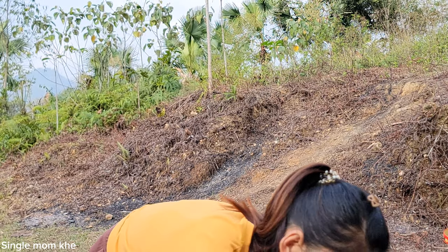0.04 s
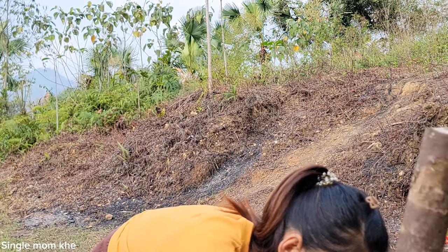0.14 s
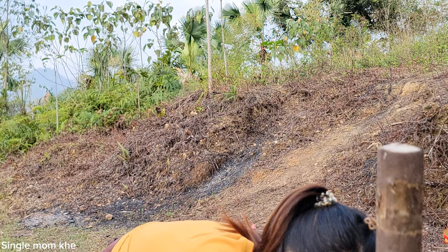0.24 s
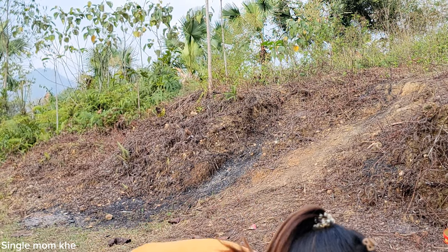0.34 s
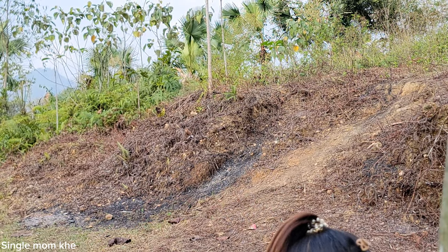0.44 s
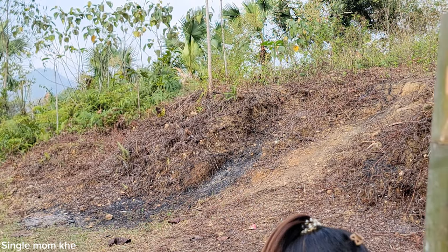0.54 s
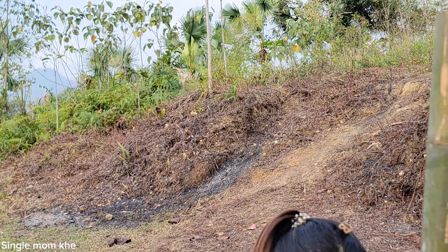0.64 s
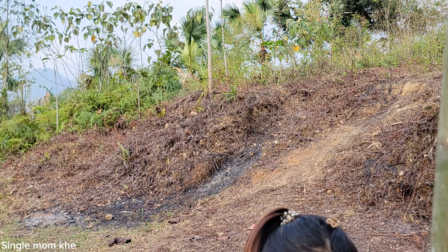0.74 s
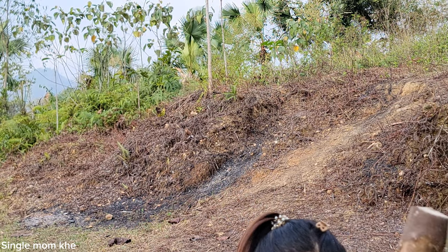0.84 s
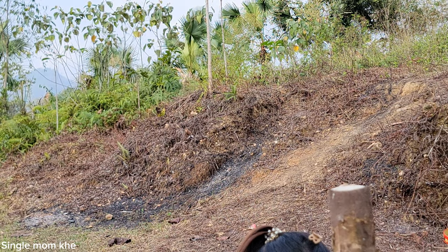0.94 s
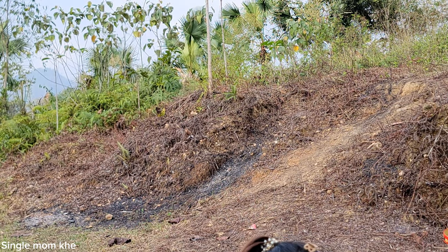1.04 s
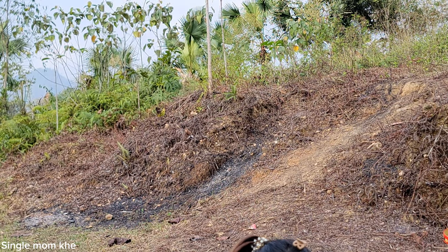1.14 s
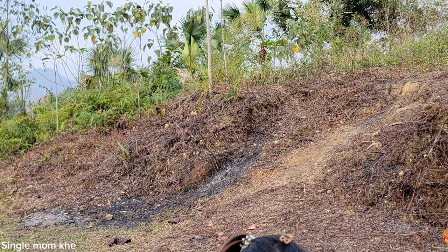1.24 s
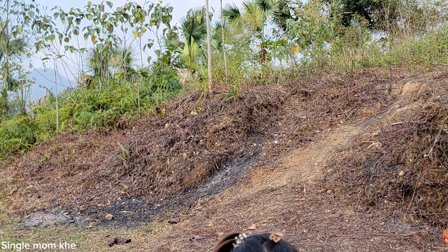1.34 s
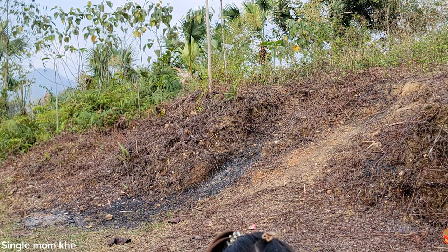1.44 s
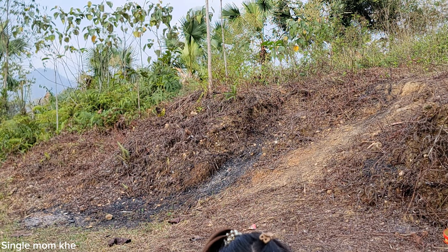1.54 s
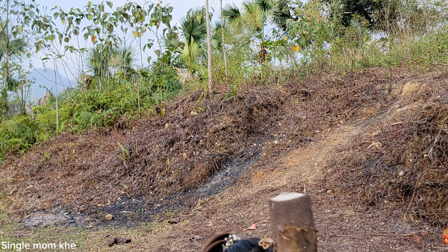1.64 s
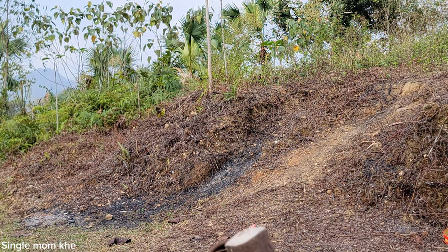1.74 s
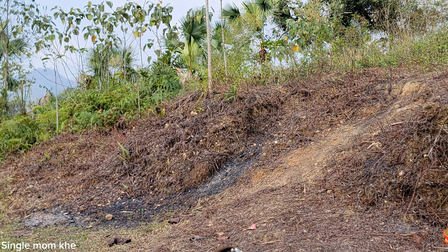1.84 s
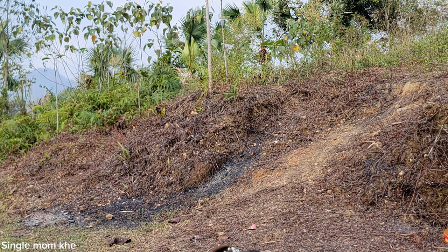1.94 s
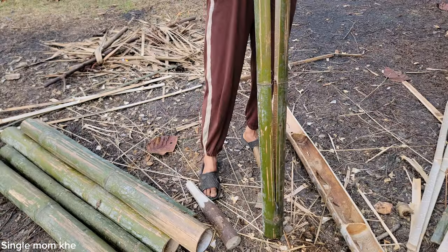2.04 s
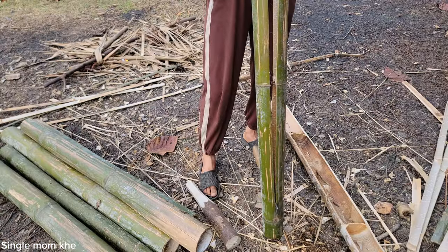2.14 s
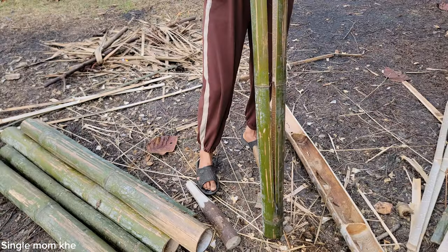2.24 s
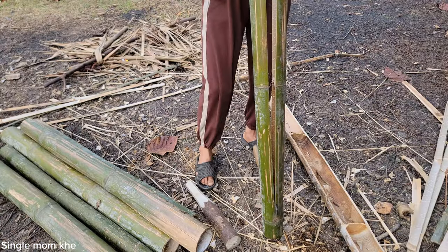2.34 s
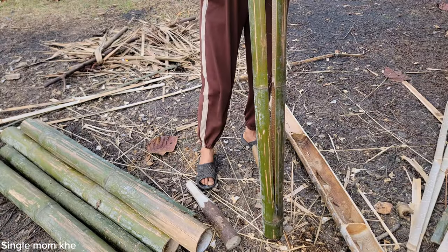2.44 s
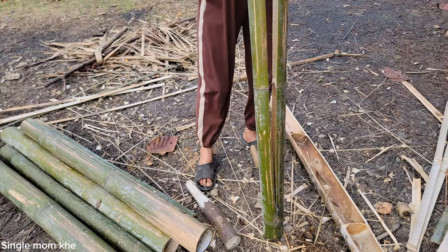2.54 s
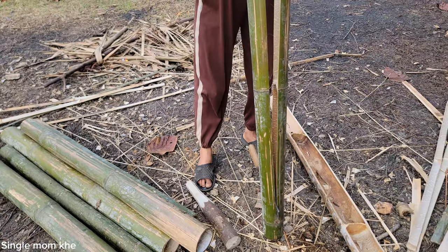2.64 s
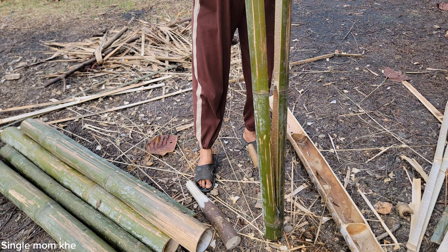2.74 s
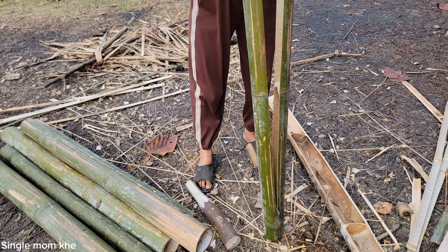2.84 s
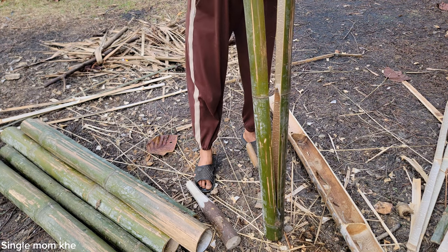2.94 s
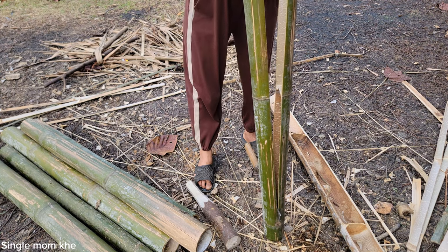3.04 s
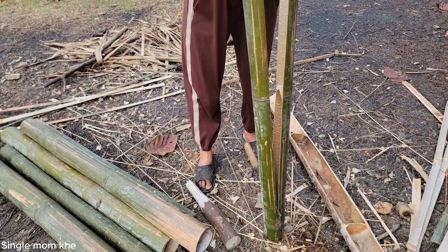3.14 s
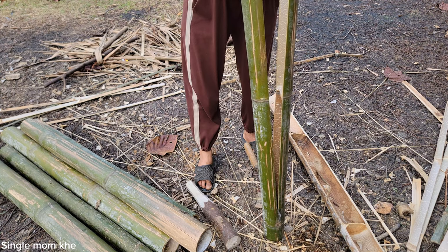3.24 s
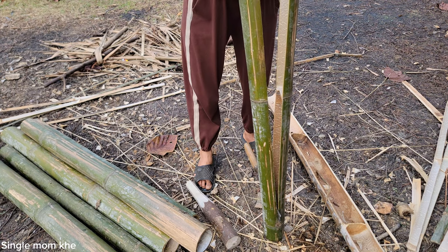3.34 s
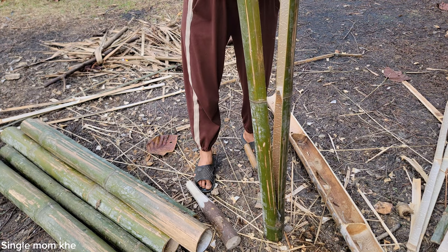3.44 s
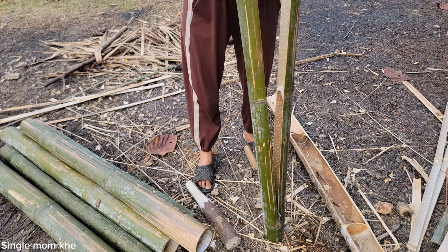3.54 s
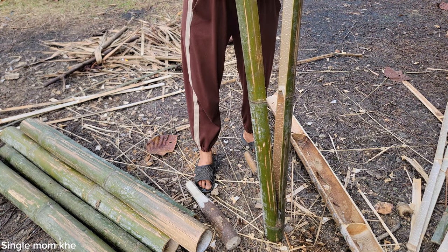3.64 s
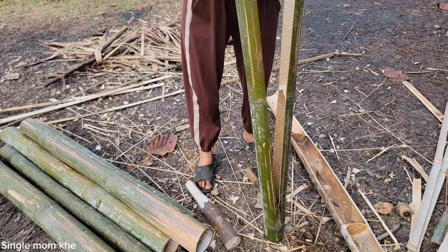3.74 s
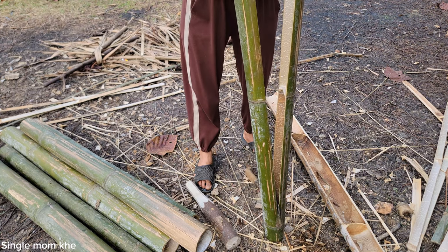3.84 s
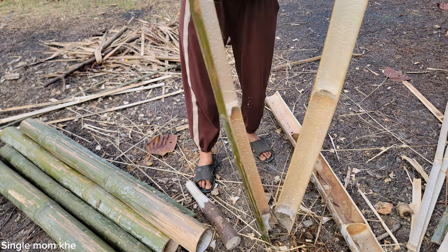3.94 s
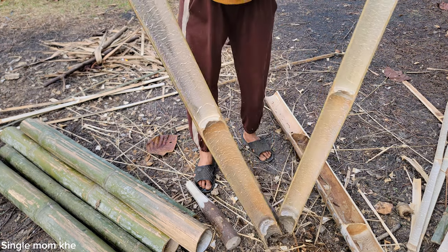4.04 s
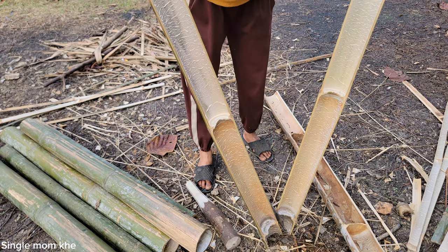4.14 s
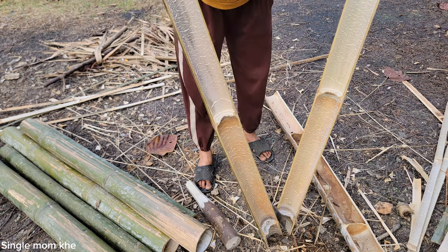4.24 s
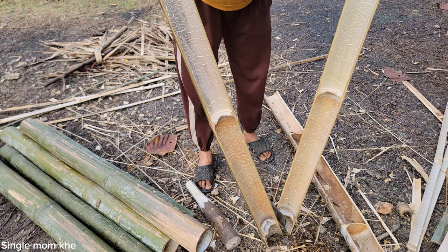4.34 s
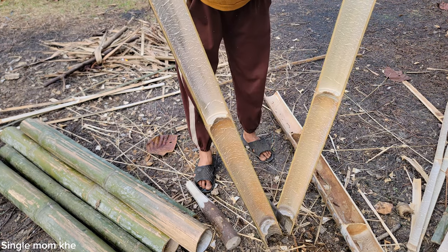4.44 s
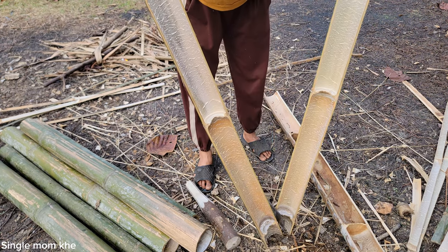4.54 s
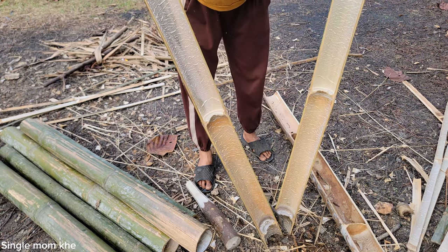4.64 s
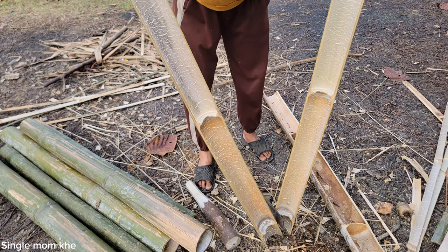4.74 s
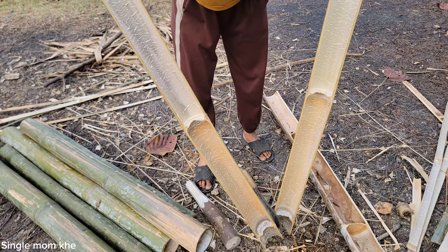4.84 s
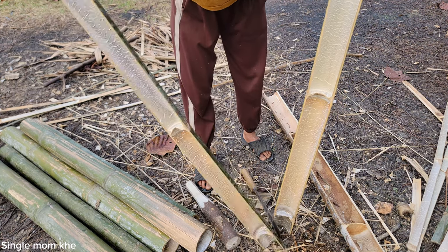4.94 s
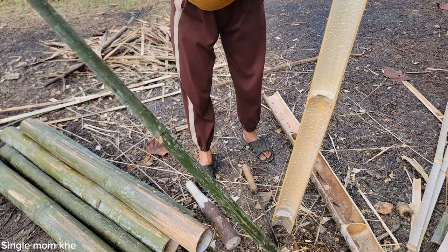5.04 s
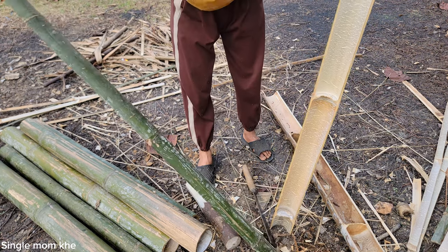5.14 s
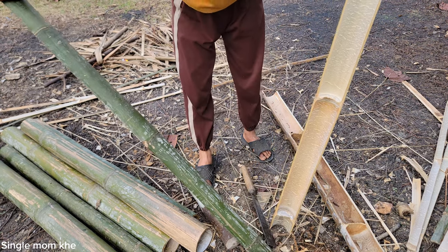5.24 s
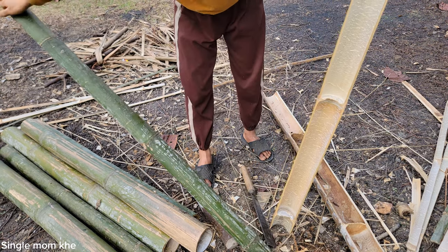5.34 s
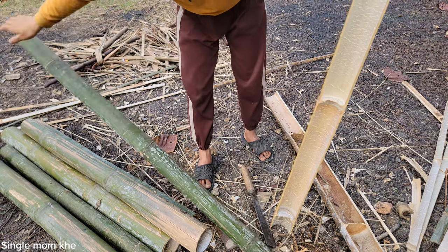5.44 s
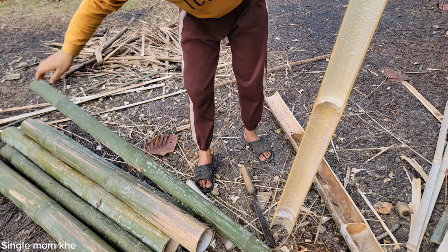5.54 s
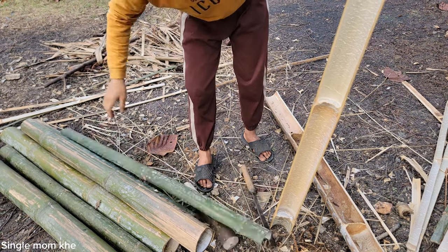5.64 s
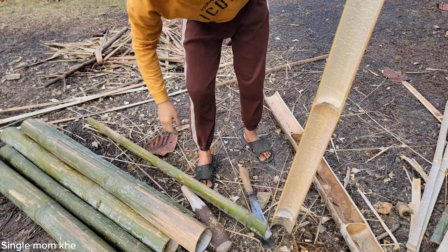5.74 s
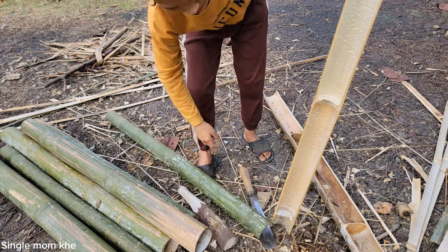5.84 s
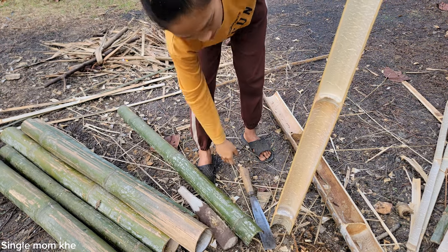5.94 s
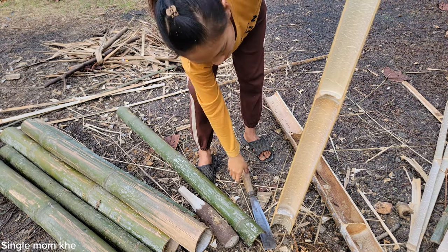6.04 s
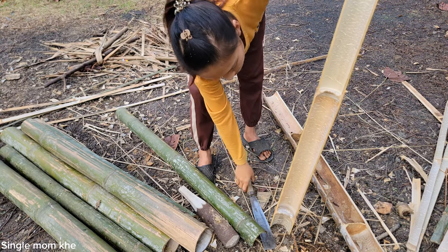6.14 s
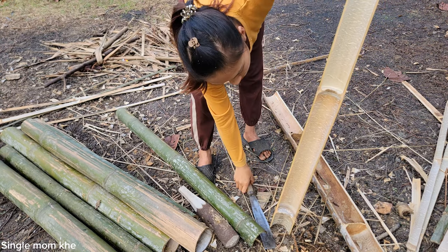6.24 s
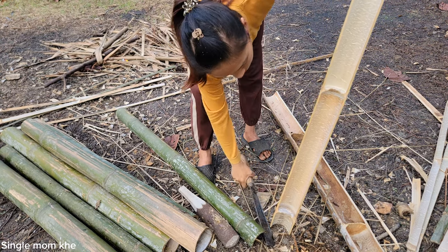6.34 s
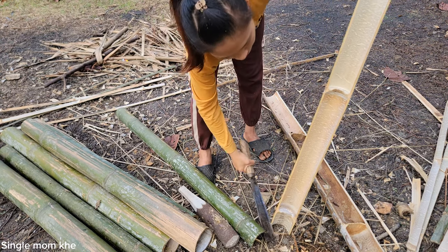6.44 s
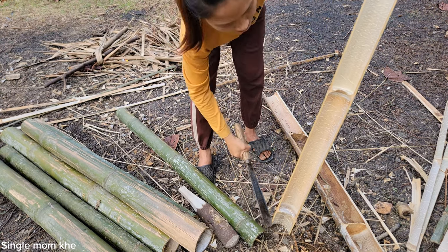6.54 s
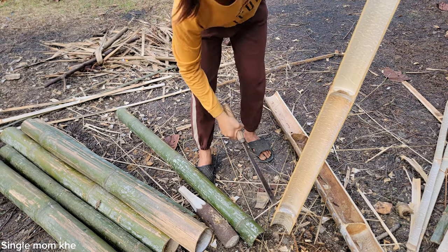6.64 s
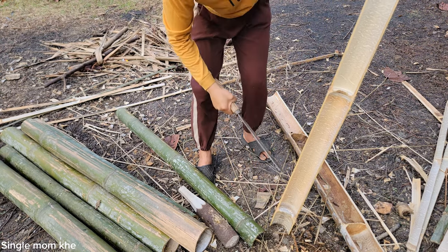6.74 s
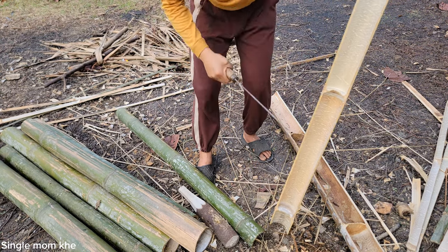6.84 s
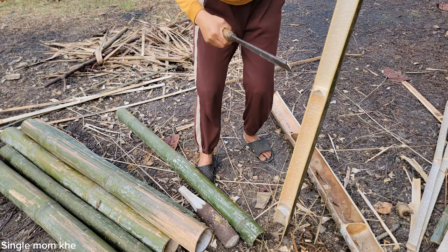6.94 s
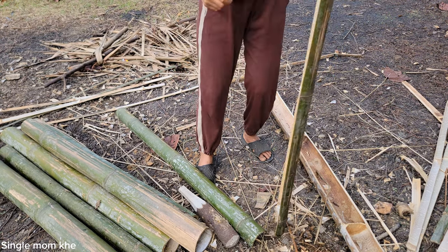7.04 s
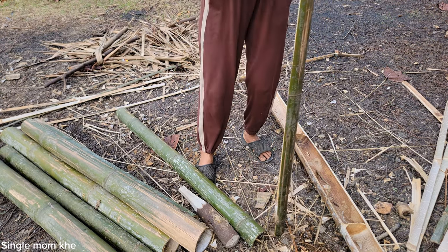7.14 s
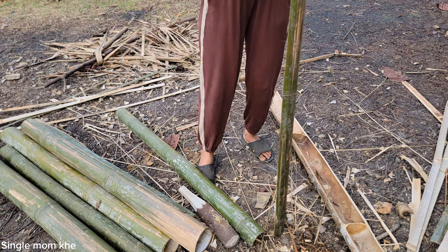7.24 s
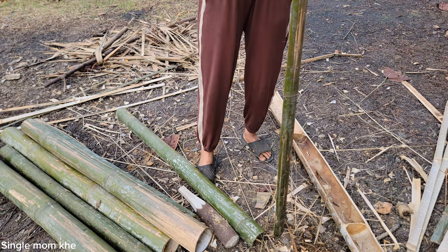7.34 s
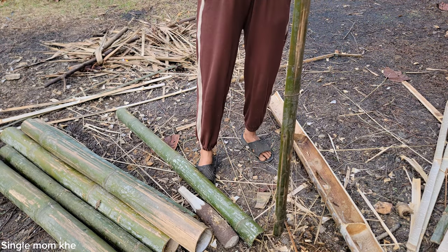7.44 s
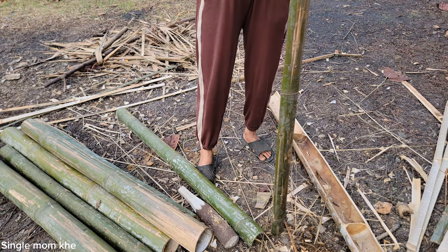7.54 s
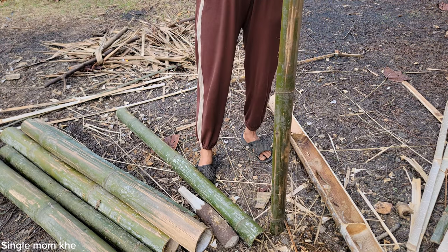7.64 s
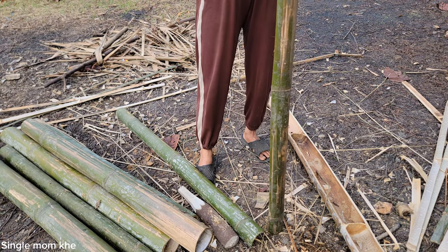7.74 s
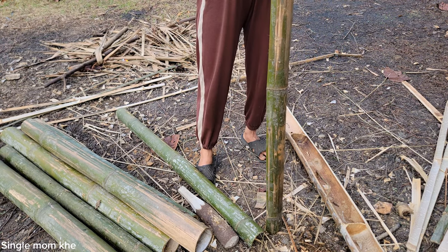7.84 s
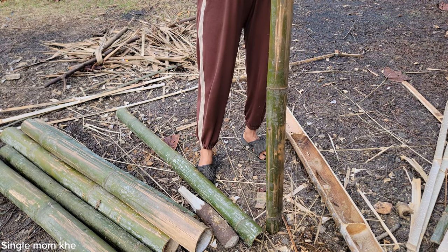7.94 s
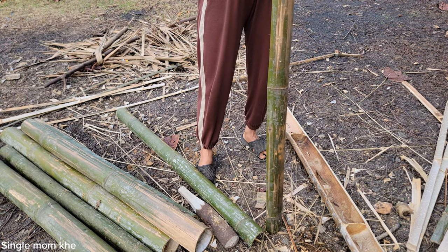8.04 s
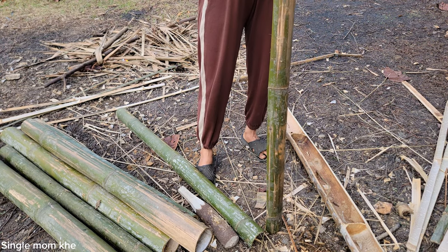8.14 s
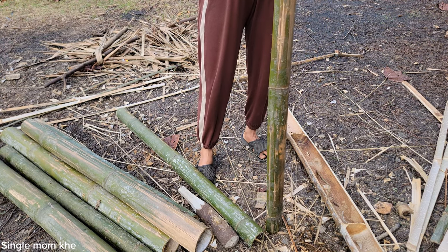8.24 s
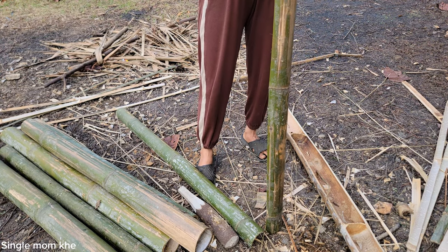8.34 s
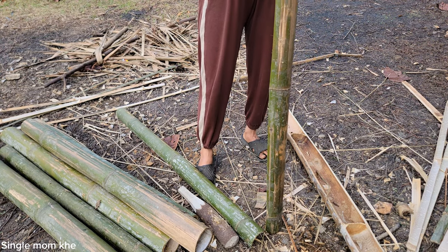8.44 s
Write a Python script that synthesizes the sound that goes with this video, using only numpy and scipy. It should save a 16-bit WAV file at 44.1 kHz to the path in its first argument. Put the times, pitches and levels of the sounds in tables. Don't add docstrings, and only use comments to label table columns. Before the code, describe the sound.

Outdoors on a hillside at a forest edge, close stereo microphone, a quiet background of hissing cicadas, soft low wind and distant murmur. At about 0.35, 1.1 and 1.87 seconds a wooden club drives a blade into bamboo: hard cracks with short, hollow, mid-pitched ringing, a low thud and faint scattered echoes. At 2.07 the background abruptly becomes slightly quieter and a cricket trills faintly. From 2.7 to 2.8 the stem splits in a dense, bright crackle, with another crack at 2.95. Fibres snap at 3.5 and 3.63, then very sharply at 3.85. Soft litter rustles follow. A light touch at 5.15 precedes the loose half dropping at 5.6, knocking and bouncing hollowly until about 6. Tiny taps and rustles continue to 8, and a crisp crack comes at 8.43. Thin, quick bird whistles recur from 1.5 to 6.5.

```python
import sys
import numpy as np
from scipy import signal
from scipy.fft import rfft, irfft, next_fast_len
from scipy.io import wavfile
from scipy.ndimage import uniform_filter1d, map_coordinates

SR = 44100
rng = np.random.default_rng(int(sys.argv[2]) if len(sys.argv) > 2 else 0)


def how_loud(loudness_db):
    steps = np.asarray(loudness_db, float) / 20
    return 10 ** steps


def int16_out(signal):
    q = np.round(np.clip(np.atleast_2d(signal).T, -1, 1) * 32767)
    wavfile.write(sys.argv[1], SR, q.astype(np.int16))


N = 374409
CHANGE_S = 2.068

# start_s, crack_db, body_db
CLUB_BLOWS = [(0.3516, -23.5, -18), (0.3631, -15, -6.5), (0.3664, -10.5, -24), (0.3784, -19.5, -17.5),
              (0.3944, -28.5, -31), (0.412, -20.5, -30), (0.6744, -40, -50), (1.0964, -16, -7),
              (1.1114, -17, -22), (1.1244, -30, -42), (1.1894, -43, -52.5), (1.3503, -45.5, -59),
              (1.8652, -6.5, -7), (1.8714, -6.5, -21), (1.8794, -16.5, -16), (1.8914, -30, -28),
              (.343, -57, -41.5), (.746, -50, -71), (1.066, -55, -48), (1.089, -40, -26),
              (1.853, -52.5, -35)]
# start_s, crack_db, body_db
SPLITS = [(2.7001, -10.5, -26), (2.7081, -4.5, -19), (2.7264, -6.5, -26.5), (2.7382, -8, -24),
          (2.7545, -3.5, -25), (2.7704, -7, -25.5), (2.7863, -15, -27.5), (2.7985, -14, -32),
          (2.9036, -58, -70), (2.9452, -13, -25.5), (2.9794, -49, -55), (3.03, -56.5, -53)]
# start_s, crack_db, body_db
TEARS = [(3.089, -48, -91), (3.329, -45, -70), (3.3761, -45.5, -69.5), (3.4123, -50.5, -84.5),
         (3.511, -8, -36.5), (3.5558, -39, -64), (3.5658, -42.5, -78), (3.5887, -32, -59),
         (3.6316, -13.5, -36), (3.698, -34.5, -65), (3.7172, -36.5, -47), (3.7587, -48, -58),
         (3.7846, -51, -43.5), (3.794, -33, -51), (3.8487, -2, -17.5), (3.9396, -29.5, -28.5),
         (3.9764, -32, -46), (4.0158, -44, -46.5), (4.375, -49, -68.5), (8.4346, -12.5, -20),
         (3.34, -44, -72), (3.611, -30, -53), (3.811, -35, -62), (3.835, -21, -40), (3.842, -17, -19),
         (8.425, -44, -49)]
# start_s, crack_db, body_db
BOUNCES = [(5.1452, -33, -32.5), (5.1726, -50, -41), (5.4415, -54.5, -68.5), (5.4714, -51.5, -58),
           (5.5054, -59, -45), (5.5363, -45, -29), (5.6022, -8, -8.5), (5.6084, -27, -12.5),
           (5.6306, -12, -17.5), (5.6374, -14, -18.5), (5.6584, -22, -37.5), (5.7339, -26, -32.5),
           (5.7478, -16, -26), (5.7684, -49, -21.5), (5.7803, -22.5, -28.5), (5.8381, -39, -47),
           (5.8626, -32, -34.5), (5.8845, -40, -38), (5.9239, -35, -33), (5.9743, -35, -56),
           (6.0167, -42, -66), (6.0394, -47, -59), (6.0726, -67, -59.5), (5.584, -48, -26.5),
           (5.712, -50, -42), (5.827, -38, -39), (5.985, -66, -44.5)]
# start_s, crack_db, body_db
TAPS = [(4.7267, -55.5, -61), (4.8634, -50, -63), (4.9162, -40.5, -53.5), (4.9874, -48.5, -48),
        (6.8447, -52.5, -57), (7.1006, -57, -60.5), (6.4029, -60.5, -51.5), (6.4213, -48, -52),
        (6.4415, -50, -43), (6.4591, -62, -45), (6.4952, -48.5, -46), (6.6712, -51, -84),
        (6.8947, -41.5, -57.5), (7.2804, -40.5, -64), (7.3781, -58, -63.5), (7.4043, -48, -56.5),
        (7.8325, -44.5, -60.5), (7.8484, -44, -55), (7.9414, -55.5, -60.5), (8.0448, -59, -66)]
# pitch_hz, level_db, t60_s
CLUB_MODES = [(524, -16, 0.032), (773, -7, .014), (1080, -1.5, 0.016), (1350, -6.5, .011), (1900, -8, .007),
              (2300, -10, .007), (2920, -7.5, .007)]
# pitch_hz, level_db, t60_s
SPLIT_MODES = [(830, -6, 0.01), (1300, -0.5, 0.011), (1840, 1, 0.006), (2993, 1.5, 0.0069)]
# pitch_hz, level_db, t60_s
CAVITY_MODES = [(591, -23, 0.17), (647, -24, 0.076)]
# pitch_hz, level_db, t60_s
DROP_MODES = [(290, -13.5, 0.056), (515.4, -6.5, 0.063), (760, -8.5, 0.057), (1020, -2.5, 0.041),
              (1300, 2.5, 0.0099), (1746, 1, 0.0024), (2429, -9.5, 0.0056)]
# pitch_hz, level_db, t60_s
TAP_MODES = [(500, -7, .015), (900, -4, .01), (1300, -2, .013), (1750, -1, .008), (2800, -5, .006)]
# frequency_hz, level_db
CRACK_COLOUR = [(500, -32.5), (1500, 5.5), (3000, 4), (6500, 7.5), (9000, -3), (13000, -10), (15800, -9.5),
                (17000, -38.5)]
# start_s, peak_db, pitch_hz, t60_s
KNOCKS = [(.364, -16, 931, .05), (.377, -20, 1295, .07), (.413, -34, 3050, 0.035), (.61, -49, 1130, .04),
          (1.866, -16.5, 1104, .05), (1.867, -20, 2796, .03), (1.88, -22, 1318, 0.062),
          (1.925, -36, 552, .1), (5.61, -27.5, 1845, 0.054), (5.75, -29, 2500, 0.07),
          (5.79, -30, 760, 0.14), (5.868, -35, 1280, 0.096), (6.075, -48, 1300, 0.053),
          (3.85, -21, 3055, .03), (.355, -16, 773, 0.087), (.4, -37, 1128, 0.38), (1.1, -18.5, 504.5, 0.12),
          (1.101, -11, 1120, 0.078), (1.175, -39.5, 1208, 0.15), (1.868, -18, 562, 0.12),
          (3.634, -38, 648, 0.069), (3.72, -59, 578, 0.16), (3.786, -41.5, 900, 0.1),
          (3.849, -13.5, 1080, 0.036), (5.149, -52, 470, 0.099), (5.606, -16.5, 760, 0.1),
          (5.774, -24.5, 1020, 0.14), (5.839, -43, 1210, 0.12), (5.927, -29.5, 499, 0.18),
          (5.928, -32, 772, 0.17), (2.712, -33, 594, 0.26), (2.788, -35, 599, 0.13),
          (2.949, -43.5, 604.6, 0.22), (5.612, -34, 290, 0.39)]
# start_s, peak_db, pitch_hz, t60_s
THUMPS = [(.37, -38, 199.5, 0.34), (1.105, -36.5, 178, 0.34), (1.872, -32, 183.5, 0.33),
          (1.875, -38, 276.5, .25), (3.717, -52, 141, 0.045), (3.86, -44, 80, 0.16),
          (5.473, -52.5, 213, 0.043), (5.586, -37, 226.8, 0.039), (5.633, -32, 200, 0.091),
          (5.659, -34, 255, 0.086), (5.713, -35.5, 290, 0.11), (5.785, -34, 252, 0.024),
          (6.449, -59, 200, 0.14), (7.379, -56, 1198, 0.0304), (7.849, -61, 130, 0.07),
          (7.849, -51.5, 1300, 0.053), (8.436, -51.5, 80, 0.18)]
# centre_hz, t60_s, level_db
HILLSIDE_ECHOES = [(91.5, 0.53, -8.5), (200, 0.64, -11.5), (420, 0.37, -14), (1030, 0.24, -18),
                   (2030, 0.52, -15), (4467, 0.33, -12), (9200, 0.12, -12.5)]
# start_s, length_s, level_db, brightness_db
RUSTLE_STROKES = [(2.27, 0.14, -74, -13), (3.511, 0.09, -74.5, 6.5), (3.686, 0.19, -74, -1.5),
                  (3.843, 0.026, -44, -8), (3.89, 0.027, -48, -11.5), (3.937, 0.014, -47, -15),
                  (3.982, 0.024, -64.5, -12), (4.053, .05, -64.5, -11), (4.123, 0.031, -68, -15),
                  (4.372, 0.036, -70.5, -16.5), (4.706, 0.049, -64.5, -24.5), (4.766, 0.038, -68, -3),
                  (4.87, 0.058, -60, -15), (4.967, .025, -60.5, -14), (5.001, 0.033, -65.5, -9.5),
                  (5.167, 0.041, -53.5, -47), (5.27, .12, -73, -13), (5.479, .1, -63, -28),
                  (5.598, 0.084, -52, -20), (5.747, 0.042, -44, -23), (5.858, 0.041, -60, -11),
                  (5.94, 0.15, -61.5, -30), (6.42, 0.071, -65, -21.5), (6.735, 0.12, -78, -18.5),
                  (6.845, 0.037, -55.5, -19), (6.911, .05, -60.5, -23), (6.979, 0.037, -64, -12.5),
                  (7.034, 0.039, -70.5, -13), (7.102, 0.038, -73.5, -11.5), (7.48, 0.064, -71, -15),
                  (7.701, 0.095, -73, -17.5), (7.82, 0.053, -91.5, -1)]
# frequency_hz, level_db
RUSTLE_LOW = [(150, -14.5), (500, -8.5), (900, -6.5), (1500, 4.5), (2700, -10.5), (7000, -24), (15600, -34),
              (16000, -71)]
# frequency_hz, level_db
RUSTLE_MIDDLE = [(1500, -12), (2600, 0), (4000, -1.5), (5600, -13.5), (9000, -29.5)]
# frequency_hz, level_db
RUSTLE_HIGH = [(3500, -25), (5800, -5.5), (7200, 1.5), (9500, -4.5), (13000, -12.5), (15700, -7.5),
               (16000, -49.5)]
# centre_hz, width_hz, level_db
CICADA_BANDS = [(7600, 1400, -5.5), (4380, 470, -7), (4880, 640, -10.5)]
# start_s, length_s, level_db
CRICKET_BOUTS = [
    (0, 1.6, -75),
    (2.077, 0.3, -63.5),
    (2.449, 0.8, -72),
    (3.1, 0.44, -62),
    (4.526, 0.49, -68),
    (5.051, 0.99, -72),
    (6.001, .5, -69),
    (6.9, .9, -72.5),
]
# time_s, pitch_hz, level_db
WHISTLE = [
    (0, 2000, -30),
    (.026, 2650, -11),
    (.042, 3650, -2),
    (.051, 3880, 0),
    (.06, 3550, -2),
    (.073, 2640, -4),
    (.09, 2700, -8),
    (.112, 2940, -12),
    (.145, 2980, -24),
]
# start_s, level_db
BIRD_CALLS = [(1.525, -60), (2.088, -60.5), (2.409, -61.5), (3.044, -60.5), (3.395, -61.5), (3.725, -83),
              (4.149, -66.5), (4.464, -66), (4.79, -63), (6.145, -64.5), (6.47, -65.5)]
# frequency_hz, level_db
FAR_COLOUR = [(25, -18), (60, -7), (130, -5.5), (300, -13), (1000, -10), (2500, -20), (5500, -24.5),
              (9500, -31.5), (15700, -36)]
FAR_DB = [-66.5, -73]
# frequency_hz, likeness (-1 to 1)
LIKENESS = [(60, 0.64), (300, 0.52), (700, -0.66), (3000, 0.49)]


def club_blows():
    hits = touched(CLUB_BLOWS, t60_s=0.0642, longer=0.21, thud_db=-21, follows=0.76)
    thud_modes = [(229, -10, .1), (126, -6, 0.24), (80, 0, .12)]
    return contacts(hits, CLUB_MODES, 4.4, 6.0, 1.6, thud_modes,
                    pan_db=0.3, detune=.06, tilt_db=-0.53, spray=0.27)


def splitting():
    hits = touched(SPLITS, t60_s=.022, longer=.02, thud_db=-42, follows=.8)
    return contacts(hits, SPLIT_MODES + CAVITY_MODES, 0.62, 6.25, 3.1, [(300, 0, .05)],
                    pan_db=-2.0, detune=0.017, tilt_db=0.5, spray=.22)


def tearing():
    hits = touched(TEARS, t60_s=0.0484, longer=0.13, thud_db=-27.5, follows=0.67)
    return contacts(hits, SPLIT_MODES, 4.5, 5.6, 2.1, [(162, 0, 0.059), (326, -1, 0.014)],
                    pan_db=-2.5, detune=0.066, tilt_db=1.05, spray=0.23)


def dropped_half():
    hits = touched(BOUNCES, t60_s=0.04, longer=-0.06, thud_db=-32.5, follows=0.3)
    return contacts(hits, DROP_MODES, 6.38, 3.9, 2.9, [(194.2, 0.026, 0.091)],
                    pan_db=-1.3, detune=0.013, tilt_db=-1.5, spray=0.301)


def handling_taps():
    hits = touched(TAPS, t60_s=0.04, longer=-0.26, thud_db=-20, follows=2)
    return contacts(hits, TAP_MODES, 3.9, 8.1, 1.74, [(148, 0, 0.1)],
                    pan_db=-3.0, detune=.07, tilt_db=1.0, spray=0.23)


def touched(table, t60_s, longer, thud_db, follows):
    hits = []
    for start_s, crack_db, body_db in table:
        contact_s = t60_s * how_loud(longer * (body_db - crack_db))
        hits.append((start_s, crack_db, body_db, thud_db + follows * body_db, contact_s))
    return hits


def contacts(hits, modes, scatter_db, body_db, linger, thud_modes, pan_db, detune, tilt_db, spray):
    cracks, thuds, body = np.zeros((3, 2, N))
    t = np.arange(9000) / SR
    for start_s, crack_db, ring_db, thud_db, t60 in hits:
        start = round(start_s * SR)
        at = slice(start, min(N, start + t.size))
        length = at.stop - at.start
        fade = how_loud(-60 * t / max(t60, .002))[:length]
        shared, left, right, wall = rng.standard_normal((4, t.size))[:, :length]

        slips = (shared + 0.74 * np.array([left, right])) * np.abs(wall) * fade * spray
        slips[:, 0] = 1.3
        cracks[:, at] += how_loud(crack_db) * slips

        onset = 1 - np.exp(-t[:length] / 0.00067)
        shudder = (wall + 0.55 * np.array([right, left])) * fade ** (1 / linger) * onset
        shudder /= np.sqrt(np.sum(shudder ** 2))
        thuds[:, at] += how_loud(thud_db) * shudder.mean(axis=0)

        chances = rng.standard_normal((len(modes), 2))
        for (hz, db, ring_s), (strength, shift) in zip(modes, chances):
            gain = how_loud(ring_db + db + scatter_db * strength)
            body[:, at] += gain * ring(shudder, hz * (1 + detune * shift), ring_s)
    body = low_cut(body, 3, 380)
    thud = sum(how_loud(db) * ring(thuds[0], hz, t60) for hz, db, t60 in thud_modes)
    tilted = [(hz, db + tilt_db * np.log2(hz / 4000)) for hz, db in CRACK_COLOUR]
    out = colour(cracks, tilted) + how_loud(body_db) * body + thud
    return out * how_loud(np.array([[.5], [-.5]]) * pan_db)


def knocks():
    out = np.zeros((2, N))
    for start_s, peak_db, hz, t60 in KNOCKS + THUMPS:
        start = round(start_s * SR)
        touch = np.zeros(SR // 3)
        push = np.sin(2 * np.pi * hz * np.arange(90) / SR) + .5 * rng.standard_normal(90)
        touch[:90] = np.hanning(90) * push / 22
        facing = 0.51 + min(.6, hz / 1600) * np.array([[1], [-1]])
        sound = ring(touch, hz, t60) + facing * ring(touch, 1.07 * hz, 0.65 * t60)
        out[:, start:][:, :touch.size] += how_loud(peak_db) * sound[:, :N - start]
    return out


def ring(x, hz, t60):
    r = how_loud(-60 / (t60 * SR))
    w = 2 * np.pi * min(hz, .45 * SR) / SR
    return signal.lfilter([0, np.sin(w)], [1, -2 * r * np.cos(w), r * r], x + 1e-18)


def near(x, wet_db):
    lag_s = .000075
    size = next_fast_len(N + 990, True)
    delay = np.exp(-2j * np.pi * np.fft.rfftfreq(size, 1 / SR) * lag_s)
    late = irfft(rfft(x[0], size) * delay, size)[:N]
    return np.array([late, x[1]]) + how_loud(wet_db) * hillside(x)


def hillside(x):
    t = np.arange(SR // 2) / SR
    tail = 0
    for hz, t60, db in HILLSIDE_ECHOES:
        band = signal.butter(2, [hz / 1.5, hz * 1.5], "band", fs=SR, output="sos")
        decay = how_loud(-60 * t / t60) * (1 - np.exp(-t / 0.0079))
        both, left, right = rng.standard_normal((3, t.size))
        apart = min(1, hz / 1500)
        scattered = np.sqrt(1 - apart ** 2) * both + apart * np.array([left, right])
        tail = tail + how_loud(db - 30.5) * decay * signal.sosfilt(band, scattered)
    return signal.fftconvolve(x.mean(axis=0, keepdims=True), tail, axes=1)[:, :N]


def rustle():
    start_s, length_s, level_db, bright_db = np.transpose(RUSTLE_STROKES)
    sizes = how_loud(3.0 * np.minimum(rng.exponential(1, (3, N)), 3))
    happens = rng.random((3, N)) < 1500 / SR
    grains = sizes * happens * rng.choice([-1, 1], (3, N))
    low, middle, high = rms_one(grains)[:, None] + 1.5 * rng.standard_normal((3, 2, N))
    low = how_loud(2.0 * drift(35)) * rms_one(colour(low, RUSTLE_LOW))
    middle = how_loud(2.5 * drift(45) - 3) * rms_one(colour(middle, RUSTLE_MIDDLE))
    high = how_loud(2.5 * drift(60) - 4.0) * rms_one(colour(high, RUSTLE_HIGH))
    dull = swells(start_s, length_s, level_db) * low
    bright = swells(start_s, length_s, level_db + bright_db + 12) * (middle + high)
    return (dull + bright) * how_loud([[-.8], [.8]])


def swells(starts, lengths, dbs):
    rise_s, fall_s = 0.025, 0.021
    settle_db, settle_s = -15, 0.11
    t = np.arange(0, N + 64, 64) / SR - starts[:, None]
    after = np.maximum(t - lengths[:, None], 0)
    rise = how_loud(dbs[:, None] - 20 * np.maximum(-t, 0) / rise_s)
    gain = rise * (how_loud(-20 * after / fall_s) + how_loud(settle_db - 20 * after / settle_s))
    return np.interp(np.arange(N) / 64, np.arange(t.shape[1]), gain.sum(axis=0))


def cicadas():
    hz = np.geomspace(1000, 20000, 200)
    chorus = 0
    for centre_hz, width_hz, db in CICADA_BANDS:
        chorus = chorus + how_loud(db) / (1 + (2 * (hz - centre_hz) / width_hz) ** 4)
    ebb_db = 0.64 * (np.arange(N) / SR - CHANGE_S)
    level_db = by_scene(-65.5, -69 - ebb_db)
    drone = rms_one(colour(diffuse(), np.c_[hz, 20 * np.log10(chorus)]))
    return drone * how_loud(level_db + 1.4 * drift(13))


def cricket():
    turns = np.cumsum(20.3 * (1 + .03 * drift(2.6))) / SR
    sounding = turns % 1 < .83 + .17 * np.sign(drift(7))
    pulses = np.sin(3 * np.pi * turns) ** 2 * sounding
    tone = np.sin(2 * np.pi * np.cumsum(4400 + 100 * drift(100)) / SR)
    return bouts() * pulses * tone * how_loud(3.5 * drift(24)) * how_loud([[1.5], [-1.5]])


def bouts():
    gain = np.zeros(N)
    for start_s, length_s, db in CRICKET_BOUTS:
        gain[round(start_s * SR):round((start_s + length_s) * SR)] = how_loud(db)
    return uniform_filter1d(gain, round(0.1 * SR))


def bird():
    out = np.zeros(N)
    time_s, hz, db = np.transpose(WHISTLE)
    t = np.arange(0, time_s[-1], 1 / SR)
    pitch = uniform_filter1d(np.interp(t, time_s, hz), size=200)
    shape_db = np.interp(t, time_s, db)
    for start_s, level_db in BIRD_CALLS:
        phase = 2 * np.pi * np.cumsum(pitch * (1 + .01 * rng.standard_normal())) / SR
        out[round(start_s * SR):][:t.size] += how_loud(level_db + shape_db) * np.sin(phase)
    out = out + 0.31 * np.roll(out, round(0.019 * SR))
    return out * how_loud([[1.0], [-1.0]]) + how_loud(15) * hillside(out[None])


def wind():
    rumble = [(20, -6.5), (45, 0.5), (90, -9.5), (200, -23.0), (500, -51.5)]   # frequency_hz, level_db
    level_db = by_scene(-72.5, -74.5) + 0.95 * drift(5.5)
    return how_loud(level_db) * rms_one(colour(diffuse(), rumble))


def far_murmur():
    return how_loud(by_scene(*FAR_DB)) * rms_one(colour(diffuse(), FAR_COLOUR))


def diffuse():
    mid, side = rng.standard_normal((2, N))
    hz, alike = np.transpose(LIKENESS)
    alike = np.clip(alike, -.95, .95)
    mid = colour(mid, np.c_[hz, 10 * np.log10(1 + alike)])
    side = colour(side, np.c_[hz, 10 * np.log10(1 - alike)])
    return np.array([mid + side, mid - side])


def drift(rate):
    knots = rng.standard_normal(900)
    return map_coordinates(knots, [np.arange(N) / SR * rate + 2], order=3)


def colour(x, spectrum):
    size = next_fast_len(N + 990, True)
    gain = how_loud(at_hz(spectrum, np.fft.rfftfreq(size, 1 / SR)))
    return irfft(rfft(x, size) * gain, size)[..., :N]


def at_hz(points, hz):
    table = np.array(points)
    return np.interp(np.log(hz + 1), np.log(table[:, 0]), table[:, 1])


def rms_one(x):
    return x / np.sqrt(np.mean(x ** 2) + 1e-20)


def low_cut(x, order, hz):
    return signal.sosfilt(signal.butter(order, hz, "high", fs=SR, output="sos"), x)


def by_scene(first, second):
    return np.where(np.arange(N) < CHANGE_S * SR, first, second)


def scene():
    hollow = knocks()
    work = splitting() + tearing() + dropped_half() + handling_taps()
    blows_near = near(club_blows() + hollow, wet_db=-3.5)
    work_near = near(work + hollow, wet_db=-6.5) + rustle()
    close = low_cut(by_scene(blows_near, work_near), 2, 70)
    return close + cicadas() + cricket() + bird() + wind() + far_murmur()


def top_cut(x):
    return signal.sosfilt(signal.butter(12, 17140, fs=SR, output="sos"), x)


def record(dry):
    rounded = .9 * np.tanh(dry / .9)
    cut = signal.sosfilt(signal.cheby2(8, 50, 17700, fs=SR, output="sos"), rounded)
    return top_cut(cut)


dry = scene()
out = record(dry)
int16_out(out)
```